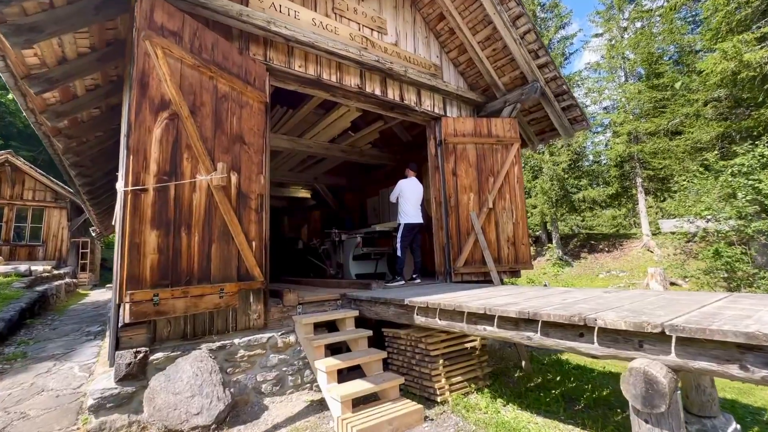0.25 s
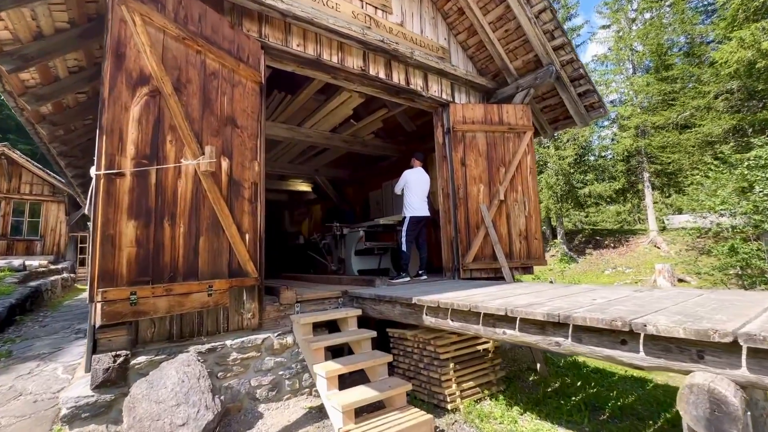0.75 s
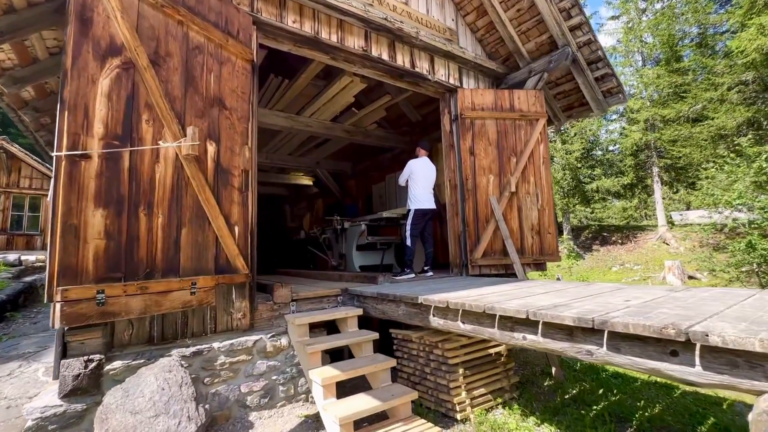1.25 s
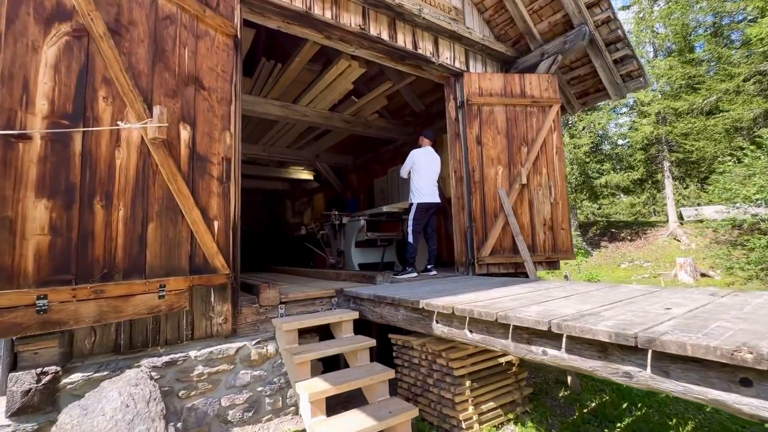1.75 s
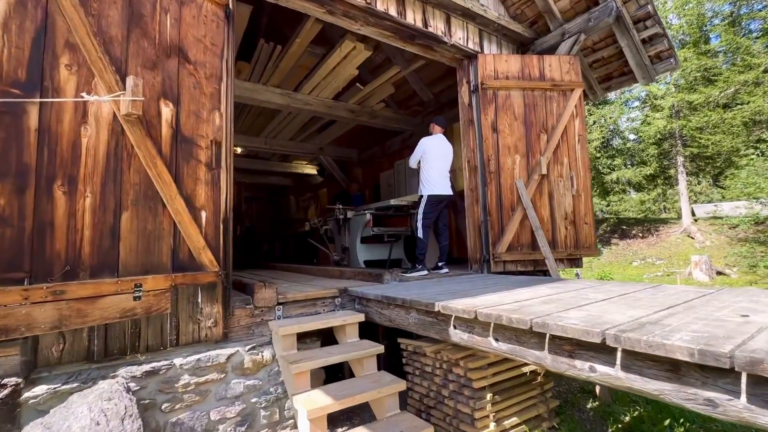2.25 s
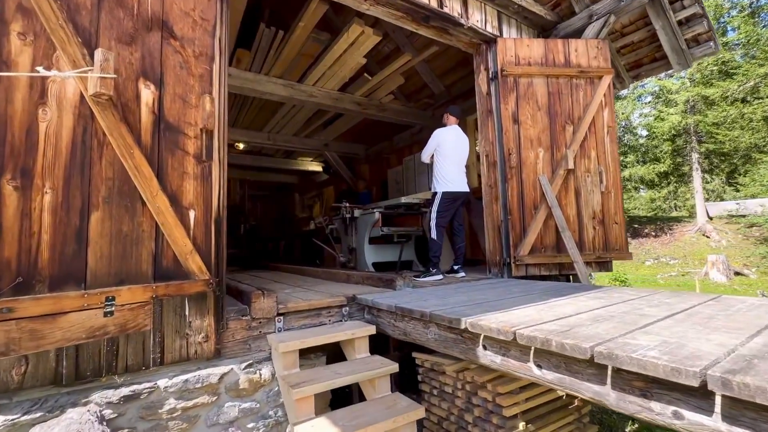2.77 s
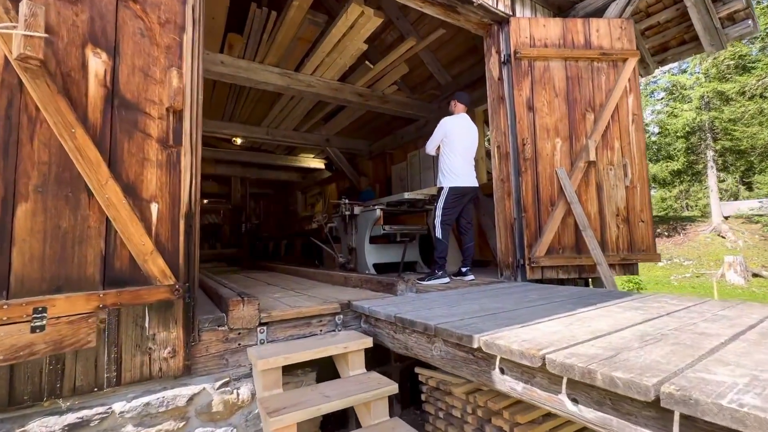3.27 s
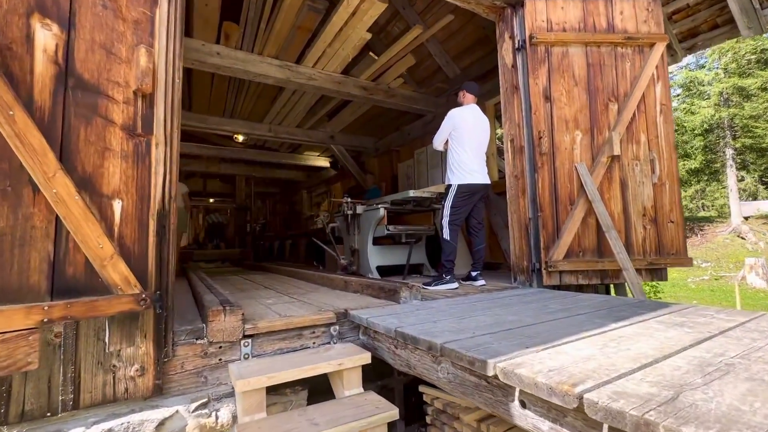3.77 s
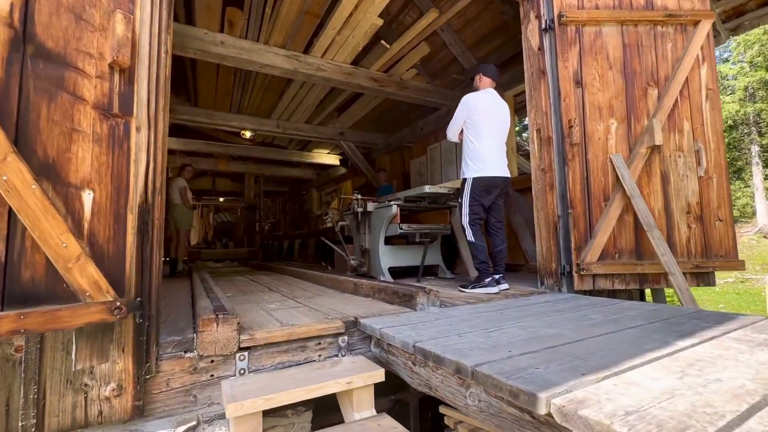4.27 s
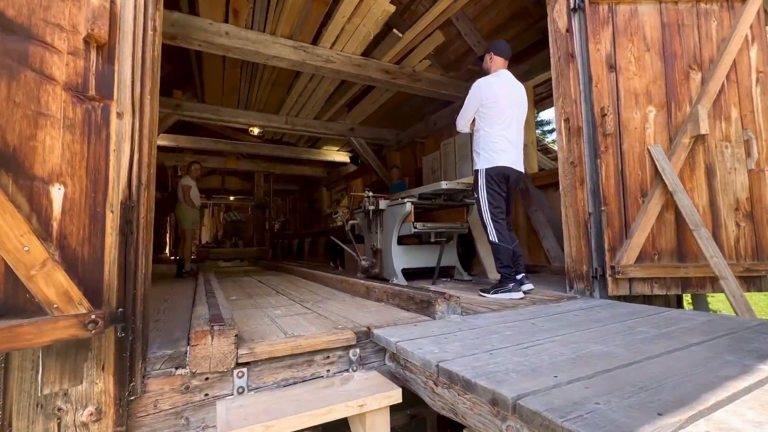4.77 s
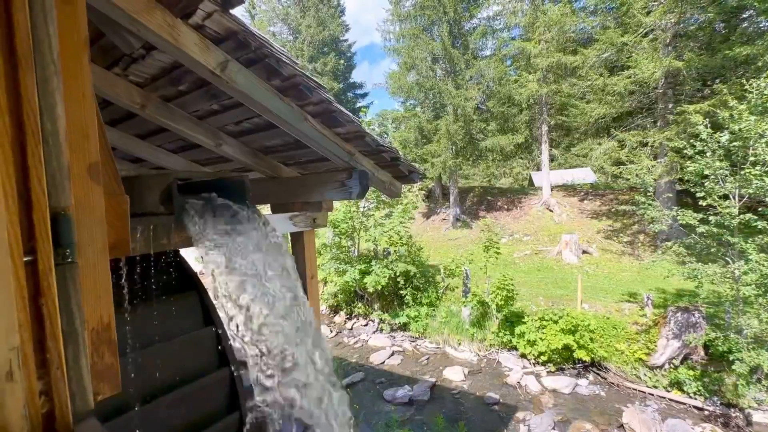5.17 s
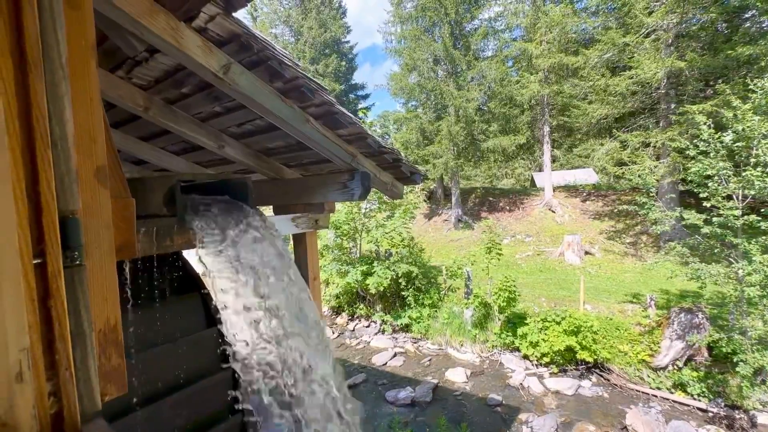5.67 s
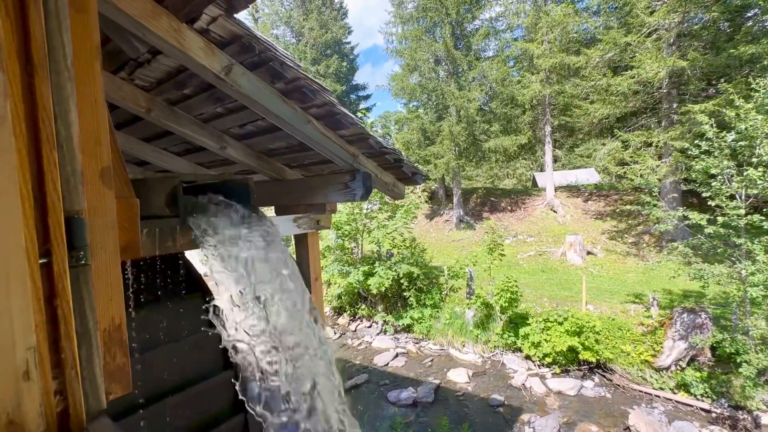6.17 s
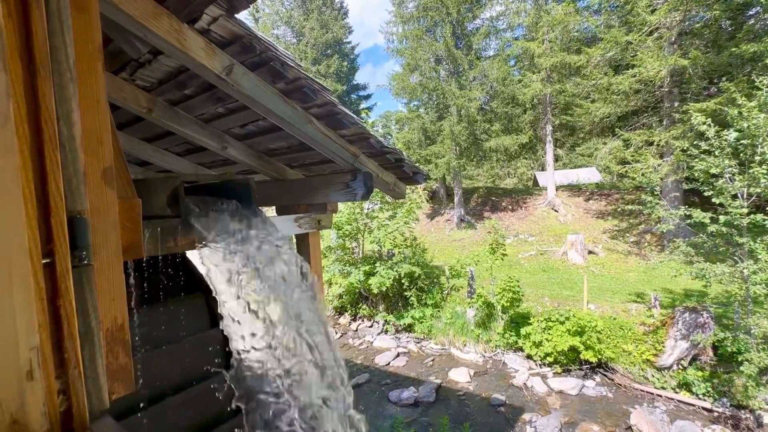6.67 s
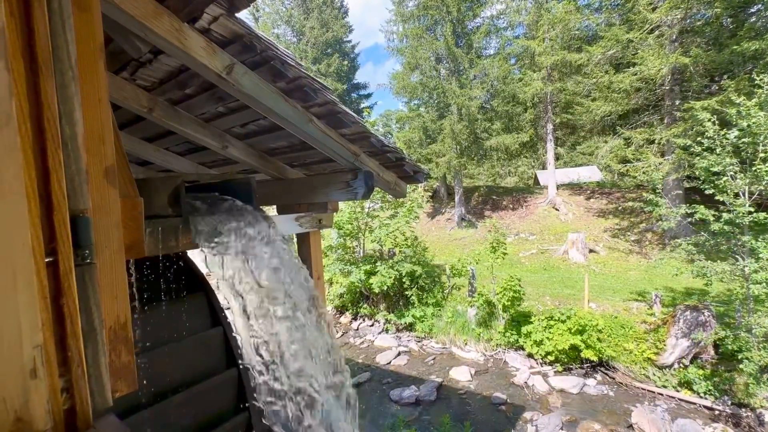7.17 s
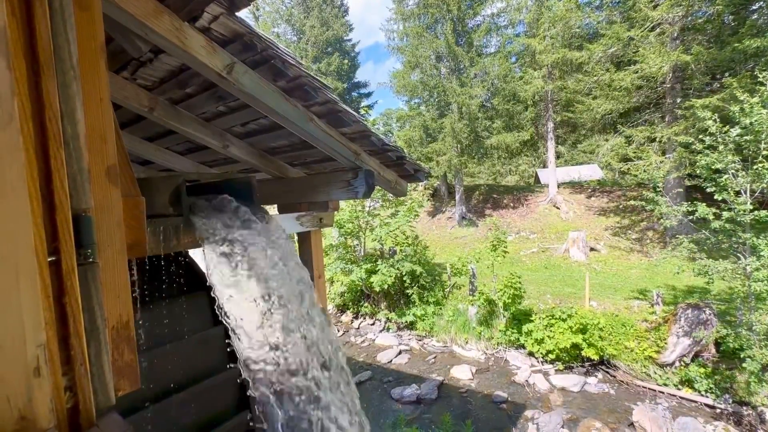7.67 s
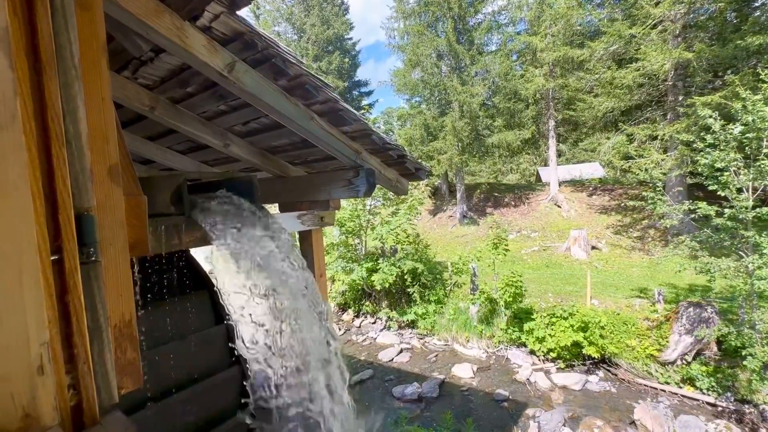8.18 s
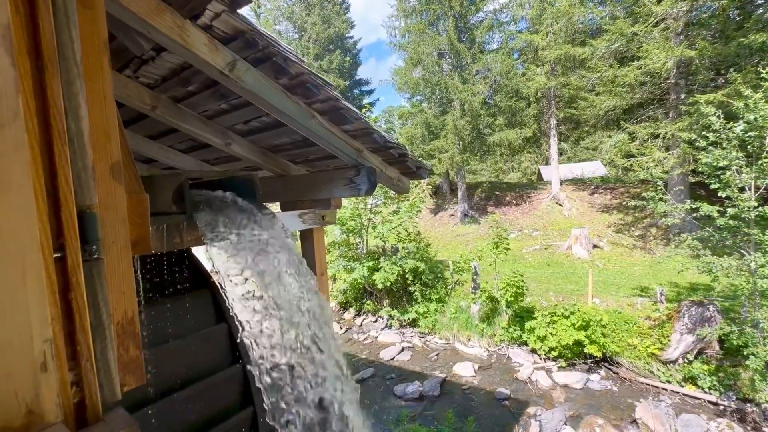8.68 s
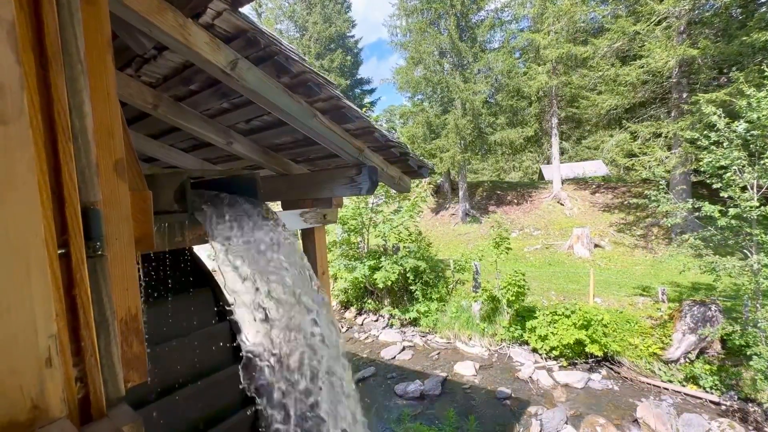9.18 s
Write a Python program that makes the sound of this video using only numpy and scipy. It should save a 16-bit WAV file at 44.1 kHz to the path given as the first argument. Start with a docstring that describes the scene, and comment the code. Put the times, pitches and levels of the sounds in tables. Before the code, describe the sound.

Muffled rushing water with soft thuds, a short silence, then a much louder splashing torrent pouring onto hollow wooden wheel buckets.

```python
"""Mill wheel from the barn door, then close up

Water pours from a wooden chute onto a mill wheel. From the barn door it is dull and drumming as the
listener walks nearer; after a short faded pause it is loud and bright beside the wheel.
Shaped noise makes the rumble, drumming, splash and spray; short rings make bubbles and pattering drops.
Single slaps fall in pitch and scatter drops, and heavy clumps thud into the hollow buckets.
"""
import sys
import numpy as np
from scipy import signal
from scipy.fft import rfft, irfft, next_fast_len
from scipy.io import wavfile
from scipy.ndimage import uniform_filter1d, map_coordinates

SR = 44100
rng = np.random.default_rng(int(sys.argv[2]) if len(sys.argv) > 2 else 0)


def generate_wav(signal):
    """Clip the signal to [-1, 1] and save it as 16-bit WAV at the path in sys.argv[1]."""
    frames = np.transpose(np.atleast_2d(signal))
    scaled = np.clip(frames, -1, 1) * 32767
    pcm = np.round(scaled).astype(np.int16)
    wavfile.write(sys.argv[1], SR, pcm)


N = 415863

# the door fades towards its end but is cut short; the wheel fades in after the pause
FADE_OUT_START_S, FADE_OUT_CUT_S, FADE_OUT_END_S = 4.725, 4.775, 4.8
FADE_IN_START_S, FADE_IN_END_S = 4.865, 5.005
WALL_ECHO_S = 0.0068  # delay of the wall on the left


def amp(db):
    """Decibels to gain."""
    return 10 ** (np.asarray(db) / 20)


def unit(x):
    """Scaled to rms 1."""
    return x / np.sqrt(np.mean(x ** 2) + 1e-20)


def along(points, hz):
    """Each value column of (f/Hz, value, ..) points, read on a log frequency axis."""
    f, *columns = np.transpose(points)
    return np.array([np.interp(np.log(hz + 1), np.log(f + 1), column) for column in columns])


def curves(rows):
    """One value per sample for each column after the time t/s."""
    s, *columns = np.transpose(rows)
    return [np.interp(np.arange(N) / SR, s, column) for column in columns]


def wobble(rate):
    """A smooth random curve with rate knots a second."""
    knots = rng.standard_normal(N // 200)
    return map_coordinates(knots, [np.arange(N) * rate / SR])


def filtered(x, response):
    """x times a complex response of frequency, padded so that its tail does not wrap round."""
    m = next_fast_len(N + SR // 2)
    return irfft(rfft(x, m) * response(np.fft.rfftfreq(m, 1 / SR)), m)[..., :N]


def glint():
    """Slow noise on a drifting carrier makes a narrow band of brighter hiss, stronger on the left."""
    # drift of the hiss as the listener walks: t/s, centre f/Hz, level/dB
    drift = [(0, 6100, -85), (1.6, 6150, -64), (2.2, 6170, -56), (2.9, 6340, -58), (3.5, 6350, -52),
             (4.2, 6230, -51), (4.8, 5950, -48)]
    hz, level_db = curves(drift)
    slow = unit(filtered(rng.standard_normal((2, N)), lambda f: 1 / (1 + (f / 220) ** 2)))
    carrier = np.sin(2 * np.pi * np.cumsum(hz) / SR)
    return amp(level_db + [[3.5], [-3.5]]) * slow * carrier


def thuds():
    """Each clump of water swells and dies within a few cycles of the bucket's note, which sags."""
    # heavy clumps thudding into a bucket: t/s, level/dB, f/Hz at the crest
    clumps = [(0.338, -28, 175), (0.775, -30, 264), (1.51, -28.5, 342), (1.956, -31, 150),
              (2.474, -28, 305), (2.557, -31, 279), (2.583, -32, 150), (2.803, -36, 357), (2.857, -29, 338),
              (3.708, -30, 261), (3.856, -27.5, 233), (4.124, -27, 256), (4.208, -30, 215),
              (4.296, -31, 332), (4.67, -26, 353), (5.222, -20, 172), (5.269, -18, 303),
              (5.356, -19.5, 304), (5.441, -19, 322), (5.511, -21, 320), (5.965, -21.5, 323),
              (6.058, -25, 279), (6.226, -19.5, 310), (6.298, -18, 306), (6.05, -21, 180),
              (6.501, -22.5, 176), (6.53, -27, 296), (6.581, -25.5, 301), (6.859, -19, 300),
              (6.015, -24, 250), (6.1, -25, 300), (6.155, -22, 303), (7.09, -25, 300), (7.19, -20, 320),
              (7.265, -25, 300), (7.3, -22, 300), (7.35, -22, 280), (7.719, -20, 294), (7.303, -21, 177),
              (7.481, -20.5, 320), (7.581, -19.5, 278), (8.067, -21, 279), (8.192, -19.5, 301),
              (8.231, -21, 276), (8.354, -18, 276), (8.391, -23.5, 162), (8.452, -19, 256),
              (8.901, -24, 170), (8.619, -18, 314), (8.942, -23, 278), (9.369, -28, 302)]
    rise_s, fall_s = 0.008, 0.0095
    out = np.zeros(N + SR)
    t = np.arange(-2000, 3000) / SR  # zero at the crest
    envelope = np.exp(-(t / np.where(t < 0, rise_s, fall_s)) ** 2)
    for s, db, hz in clumps:
        cycles = hz * t * (1 - 3.8 * t)  # the squared term makes the note sag
        ring = envelope * np.sin(2 * np.pi * (cycles + rng.random()))
        out[round((s + t[0]) * SR):][:len(t)] += amp(db) * ring
    return out[:N] * amp([[-2], [2]])  # left, right


def slaps():
    """A smack that drops in pitch, answered by the wall on the left, then a ragged scatter of drops."""
    # water slapping on wood: t/s, right level/dB, starting f/Hz, cycles to fall 25 dB, splatter level/dB
    hits = [(0.3165, -30, 1300, 4, 4), (2.0612, -26, 2800, 2, -5), (2.0635, -21, 4200, 2, -5),
            (2.0676, -21, 1600, 3, -6), (2.4922, -14, 1100, 2.5, -16), (2.4925, -21, 3000, 2, -18),
            (3.7025, -27, 1800, 3, -8), (3.809, -31, 2600, 4, -2), (4.146, -31, 2800, 5, -2),
            (5.063, -9, 1200, 3, -9), (5.718, -15, 1000, 4, 0), (5.7722, -9.5, 1800, 4, -4),
            (5.964, -13, 1100, 3, -7), (6.385, -16, 1800, 3, -1), (7.145, -14, 950, 5, -4),
            (7.165, -16, 1400, 4, 1), (7.1843, -10, 1600, 3, -6), (7.258, -13, 1300, 3, -3),
            (7.3003, -12, 2200, 5, 0), (7.3015, -13, 900, 4, -9), (7.34, -14, 1000, 5, -4),
            (7.565, -13, 900, 6, -3), (7.605, -14, 950, 5, -5), (7.65, -13, 900, 5, -4),
            (7.745, -14, 2200, 3, 0), (7.7955, -7, 1500, 2, -9), (7.9662, -11, 2000, 2.5, -7),
            (9.2855, 0, 2200, 3.5, -11), (9.288, -12, 1000, 8, -7), (9.313, -14, 950, 5, -8),
            (9.3185, -13, 1200, 4, -8)]
    splatter_s, pitch_spread, drop_cycles = 0.018, 0.3, 3  # mean delay, log spread, cycles to fall 25 dB
    out = np.zeros((2, N + SR))
    t = np.arange(400) / SR
    for s, right_db, hz, cycles, splatter_db in hits:
        at_door = s < FADE_IN_START_S
        left_db, echo_db = right_db + np.array((-2, -9) if at_door else (-9, -6))
        fall = amp(-25 * t * hz / cycles)
        attack = 1 - np.exp(-4 * t * hz)
        smack = -1.4 * np.sin(2 * np.pi * hz * t / (1 + 100 * t)) * fall * attack
        arrivals = ((0, s, left_db), (1, s, right_db), (0, s + WALL_ECHO_S, echo_db))
        for side, start, db in arrivals:
            out[side, round(start * SR):][:len(t)] += amp(db) * smack
        for side, db in enumerate((echo_db, right_db)):
            delays = rng.exponential(splatter_s, size=30)
            for late, tune, size_db in zip(delays, *rng.standard_normal((2, 30))):
                phase = hz * np.exp(pitch_spread * tune) * t  # in cycles
                # later drops are weaker, by 200 dB a second
                drop_db = db + splatter_db + 2.5 * size_db - 200 * late - 25 * phase / drop_cycles
                out[side, round((s + late) * SR):][:len(t)] += amp(drop_db) * np.sin(2 * np.pi * phase)
    # softened above 7 kHz, thinned below 300 Hz
    return filtered(out[:, :N], lambda f: 1 / (1 + 1j * f / 7000) ** 3 * f / (f - 300j))


def stereo(likeness, hz, wall):
    """Weights of a shared sound, repeated by the wall on the left, and of a private sound per side."""
    share, lag = along(likeness, hz)
    echo = (1 + wall * np.exp(-2j * np.pi * hz * WALL_ECHO_S)) / np.sqrt(1 + wall ** 2)
    late = np.exp(-.5j * lag)
    shared = np.sqrt(share) * np.array([late * echo, late.conj()])
    return shared, np.sqrt(1 - share)


def churn(likeness, patchy_db, flutter_db, flutter_rate, wall):
    """Stereo noise in patches of random gain, with a quick flutter as clumps of water land."""
    z = signal.stft(rng.standard_normal((3, N)), nperseg=512)[2]
    field = uniform_filter1d(rng.standard_normal(z.shape[1:]), size=4, axis=0)  # over frequency
    field = uniform_filter1d(field, size=6, axis=1)  # over time
    noise = signal.istft(z * amp(patchy_db * unit(field)), nperseg=512)[1][:, :N]
    noise = noise * amp(flutter_db * wobble(flutter_rate))
    shared = filtered(noise[0], lambda hz: stereo(likeness, hz, wall)[0])
    private = filtered(noise[1:], lambda hz: stereo(likeness, hz, wall)[1])
    return shared + private


def bubbles(count, pitch_hz, spread, cycles, scatter_db):
    """Air pockets ring for a few cycles with rising pitch, each from its own side."""
    draw = rng.random((count, 3))  # moment, loudness, side
    t = np.arange(400) / SR
    hz = pitch_hz * np.exp(spread * rng.standard_normal((count, 1)))
    age = t * hz / cycles
    envelope = np.exp(-3 * age) * (1 - np.exp(-25 * age))
    ring = np.sin(2 * np.pi * hz * t * (1 + 0.065 * age)) * envelope
    ring = ring * amp(-scatter_db * np.log(1 - .99 * draw[:, 1:2]))  # a few are much louder
    side = 2 * draw[:, 2:] - 1
    start = draw[:, :1] * N + 30

    def place(sign):
        """One microphone: every ring shifted in time and level by its side."""
        first = (start + sign * side * 16).astype(int)
        where = first + np.arange(400)
        return np.bincount(where.ravel(), (ring * amp(-3 * sign * side)).ravel(), N + 500)[:N]

    return unit(np.array([place(0.84), place(-1.35)]))


def band(colour, low_hz, high_hz, hollow):
    """One band of the colour, lifted or dulled at the hollow resonances."""
    def response(hz):
        lift_db = sum(np.outer(db, 1 / (1 + (2 * (hz - c) / w) ** 2)) for c, w, *db in hollow)
        edges = 1 / np.sqrt((1 + (low_hz / (hz + 1)) ** 8) * (1 + (hz / high_hz) ** 8))
        return amp(along(colour, hz) + lift_db) * edges
    return response


def drumming_db(swell_db):
    """Drumming swells about once a second and surges at random as the sheet breaks up."""
    t = np.arange(N) / SR
    swell = np.cos(2 * np.pi * 0.93 * (t - 4.96))  # Hz, s
    return swell_db * swell - 0.27 * wobble(4.7)


def water(flow, colour, likeness, hollow, rumble_db, bubble_db, patter_db, swell_db):
    """Noise bands of rumble, drumming, splash and spray; bubbles and pattering drops join the splash."""
    drum_db, splash_db, spray_db = curves(flow)
    drum_db = drum_db + drumming_db(swell_db)

    lows = churn(likeness, patchy_db=.7, flutter_db=0.3, flutter_rate=42, wall=0.028)
    rumble = filtered(lows, band(colour, 0.91, 124, hollow))
    drum = filtered(lows, band(colour, 165, 855, hollow))

    foam = unit(churn(likeness, patchy_db=1.5, flutter_db=.6, flutter_rate=90, wall=0.8))
    ringing = bubbles(count=7000, pitch_hz=1250, spread=.5, cycles=8, scatter_db=2.8)
    patter = bubbles(count=5000, pitch_hz=1700, spread=.45, cycles=2, scatter_db=3)
    foam = foam + amp(bubble_db) * ringing + amp(patter_db) * patter
    foam = foam * amp(0.9 * wobble(14))  # the sheet lands in uneven surges
    splash = filtered(foam, band(colour, 773, 4070, hollow))

    hiss = churn(likeness, patchy_db=1.67, flutter_db=0.25, flutter_rate=33, wall=0)
    spray = filtered(hiss, band(colour, 2600, 30000, hollow))

    # the rumble grows with the spray as the listener draws near
    nearness_db = spray_db - spray_db.mean()
    out = amp(rumble_db + nearness_db) * unit(rumble)
    for layer, level_db in ((drum, drum_db), (splash, splash_db), (spray, spray_db)):
        out = out + amp(level_db) * unit(layer)
    return out


def water_at_door():
    """The wheel heard from the barn door, whose front lifts or dulls some bands of the water noise."""
    # water as the listener nears: t/s, drumming level/dB before its swell, splash level/dB, spray level/dB
    flow = [(0, -38, -42, -45.5), (1.3, -36, -41, -45), (1.7, -38.5, -41, -44.5), (2.5, -34.5, -40, -44),
            (3.2, -36.5, -39.5, -41.5), (4.15, -34.5, -39, -41.5), (4.75, -35, -37.5, -42.5)]
    # relative colour at the microphones: f/Hz, left level/dB, right level/dB
    colour = [(22, -38, -51), (46.3, -14.5, -14), (98, -9.5, -9), (226, -4, -0.5), (358, -3, -3.5),
              (460, -5, -5), (600, -13.5, -12.5), (770, -13.5, -9.5), (1220, -19, -15), (2360, -19.5, -17),
              (3240, -23.5, -21.5), (6050, -17.5, -22), (7100, -21.5, -17.5)]
    # top of the relative colour, with a dip near 12 kHz: f/Hz, left level/dB, right level/dB
    top = [(10200, -24.5, -21.5), (12000, -35, -35), (15500, -28, -28)]
    # stereo likeness, none near 11.5 kHz and nearly mono at the top:
    # f/Hz, share of power [0-1], left lag [radians]
    likeness = [(50, .94, .35), (330, .89, .45), (600, .45, 1.8), (850, .4, .6), (1500, .35, 2.6),
                (2400, .45, 6), (3500, .3, 9), (9000, .25, 19), (11500, 0, 8 * np.pi),
                (13300, .95, 8 * np.pi)]
    # bands shaped by the barn front: f/Hz, width/Hz, left boost/dB, right boost/dB
    barn = [(240, 41, 2.5, 2), (350, 36, 1.5, 5.5), (770, 70, 2.5, 1.5), (910, 63, 3, 1),
            (1360, 280, 1.5, -2), (1650, 160, 4.5, 2), (2760, 250, 2.5, -3.5), (3540, 350, 2, -3),
            (4000, 250, 2.5, 2.5), (5440, 200, 3, 3.5), (7100, 670, 2.5, -10.5)]
    return water(flow, colour + top, likeness, hollow=barn, rumble_db=-45.0, bubble_db=-15,
                 patter_db=-22.5, swell_db=-1.0)


def water_at_wheel():
    """Close beside the wheel, where resonances of the hollow wooden buckets colour the water noise."""
    # water beside the wheel: t/s, drumming level/dB before its swell, splash level/dB, spray level/dB
    flow = [(5, -31, -26.5, -31.5), (5.4, -28, -26, -31), (5.75, -30.5, -26, -32),
            (6.05, -28.5, -25.5, -30), (6.4, -28.5, -26, -30.5), (6.8, -28, -25, -31),
            (7.2, -28.5, -25, -30.5), (7.55, -28.5, -25.5, -31), (8, -29, -25, -29.5),
            (8.4, -28, -25.5, -30), (8.8, -28.5, -25, -30.5), (9.15, -29.5, -26, -30),
            (9.43, -28, -25.5, -30.5)]
    # relative colour at the microphones: f/Hz, left level/dB, right level/dB
    colour = [(22, -50, -50), (45.5, -25, -17.5), (77.6, -10, -10.5), (116, -12.5, -8), (190, -1.5, 2),
              (410, -2.5, -1.5), (670, -12, -3), (1035, -16.5, -13), (1960, -15.5, -13),
              (3530, -18.5, -19.5), (5780, -12, -19.5), (7360, -18, -18.5)]
    # top of the relative colour, with a dip near 11.4 kHz: f/Hz, left level/dB, right level/dB
    top = [(10200, -20.5, -15.5), (11400, -28, -28), (12900, -21, -21), (15500, -21.5, -21.5)]
    # stereo likeness, none near 11.5 kHz and nearly mono at the top:
    # f/Hz, share of power [0-1], left lag [radians]
    likeness = [(50, .97, .3), (330, .93, .3), (550, .2, 1), (850, .75, -.6), (1400, .35, .6),
                (1900, .45, 2.4), (2600, .5, 0), (3500, .35, 2.6), (9000, .3, 7), (11500, 0, 4 * np.pi),
                (13800, .9, 4 * np.pi)]
    # hollow wooden buckets: f/Hz, width/Hz, left boost/dB, right boost/dB
    buckets = [(306, 54, 7, 8), (422, 37, 2.5, 2.5), (754, 63, 1.5, 1), (856, 99, 3.5, 5),
               (1077, 120, 8.5, 3.5), (1250, 18, 5, 8), (1484, 30, 9, 6), (1620, 91, 3, 1),
               (2054, 40, 1.5, 5.5), (2760, 33, 1, 2), (3000, 130, 3.5, -1.5), (3610, 150, 4.5, -2)]
    return water(flow, colour + top, likeness, hollow=buckets, rumble_db=-41.5, bubble_db=-19.5,
                 patter_db=-17.5, swell_db=-0.5)


def scene():
    """The barn door up to the end of the pause, the wheel after it, with slaps and thuds at both."""
    at_door = np.arange(N) / SR < FADE_IN_START_S
    place = np.where(at_door, water_at_door() + glint(), water_at_wheel())
    return place + slaps() + thuds()


def record(dry):
    """A fade-out cut short, silence, a fade-in that starts gently; nothing above 15750 Hz."""
    t = np.arange(N) / SR
    leaving = np.clip((FADE_OUT_END_S - t) / (FADE_OUT_END_S - FADE_OUT_START_S), 0, 1)
    # the cut drops 25 dB at once, then 700 dB a second
    leaving = leaving * amp(-25 * (t > FADE_OUT_CUT_S) - 700 * np.clip(t - FADE_OUT_CUT_S, 0, 1))
    arriving = np.clip((t - FADE_IN_START_S) / (FADE_IN_END_S - FADE_IN_START_S), 0, 1) ** 1.6
    return filtered(dry * (leaving + arriving), lambda hz: np.clip((15750 - hz) / 100, 0, 1) ** 2)


dry = scene()
out = record(dry)
generate_wav(out)
```